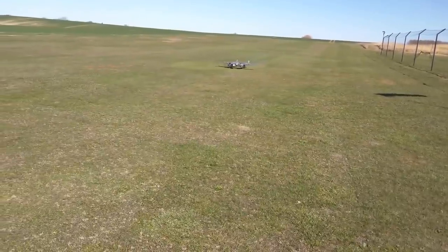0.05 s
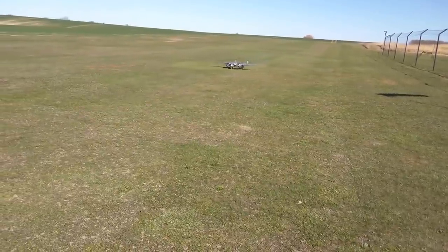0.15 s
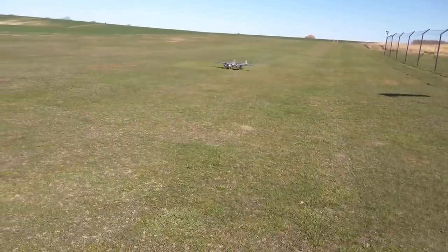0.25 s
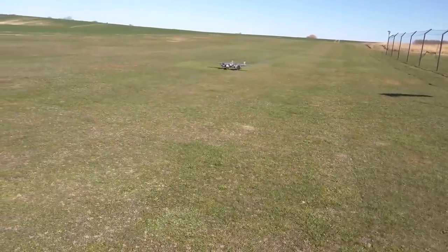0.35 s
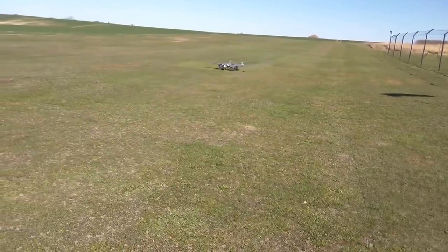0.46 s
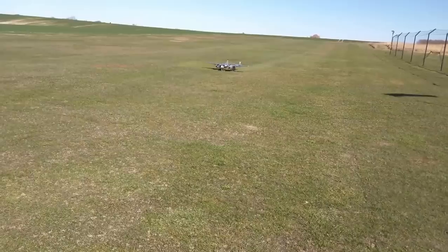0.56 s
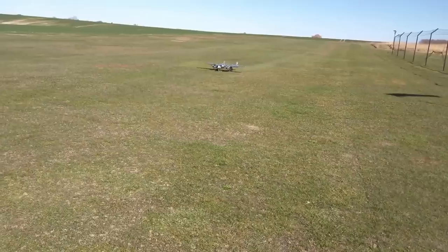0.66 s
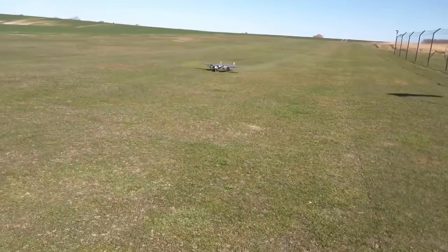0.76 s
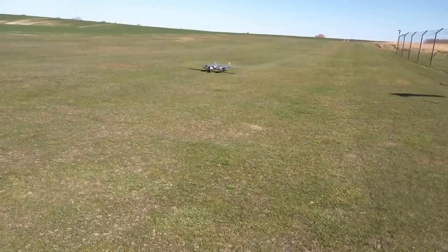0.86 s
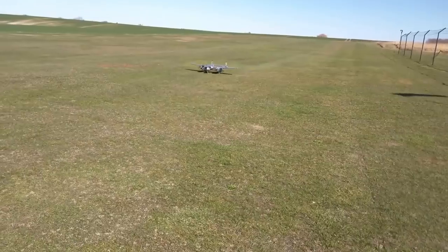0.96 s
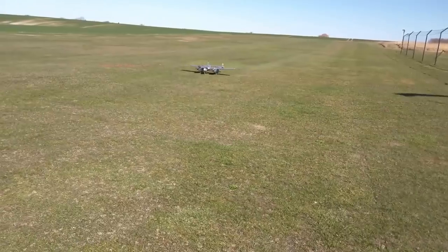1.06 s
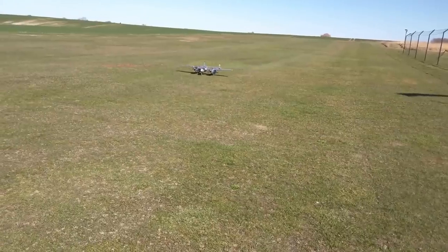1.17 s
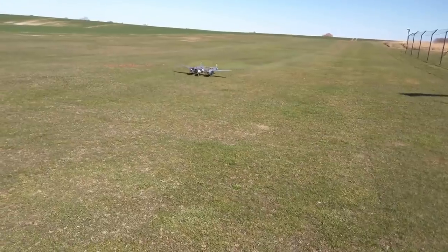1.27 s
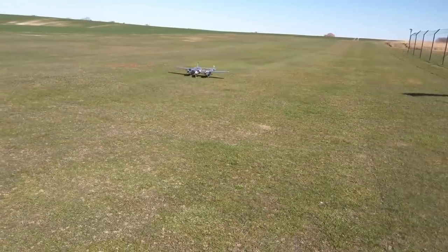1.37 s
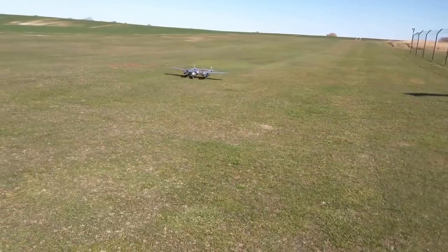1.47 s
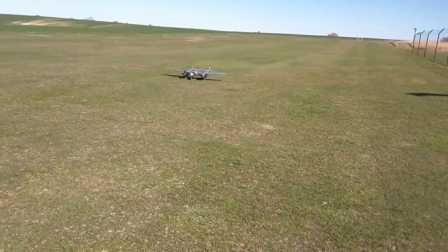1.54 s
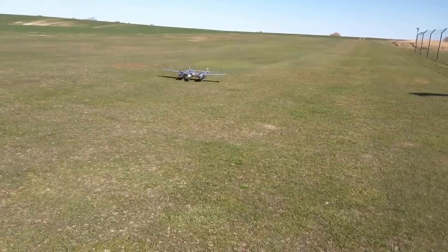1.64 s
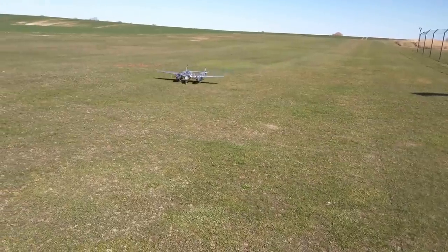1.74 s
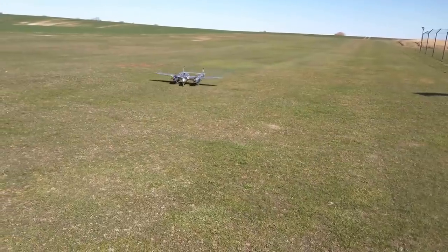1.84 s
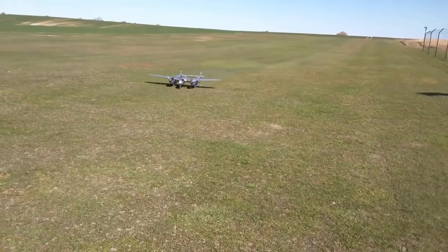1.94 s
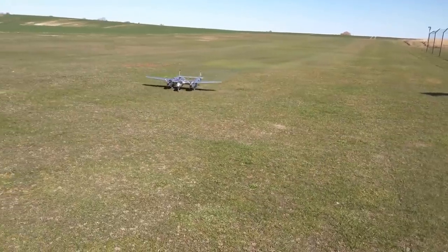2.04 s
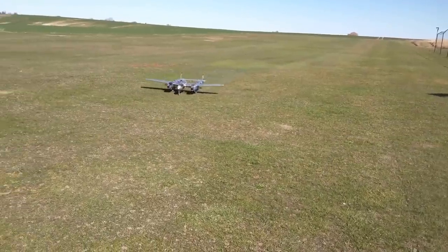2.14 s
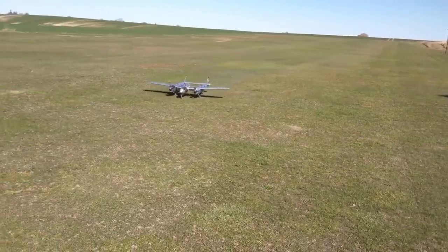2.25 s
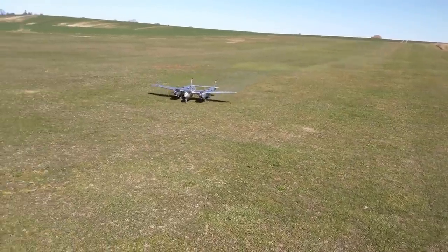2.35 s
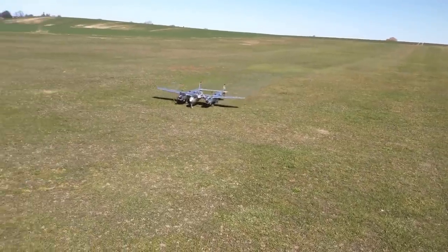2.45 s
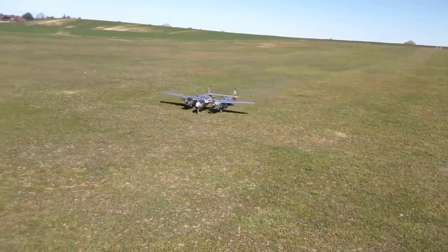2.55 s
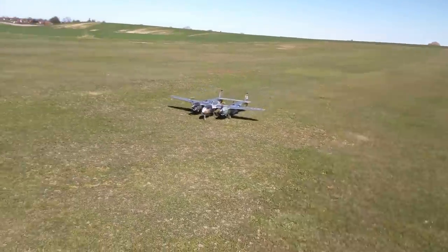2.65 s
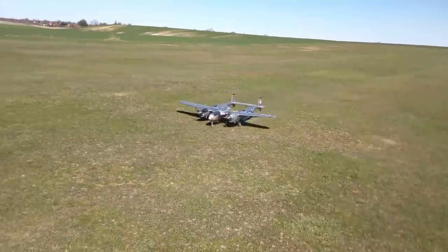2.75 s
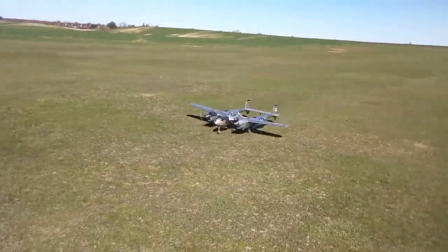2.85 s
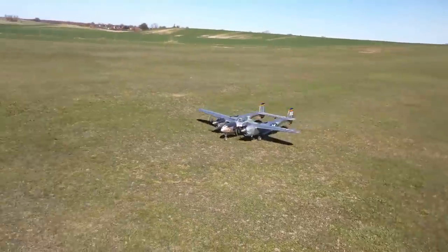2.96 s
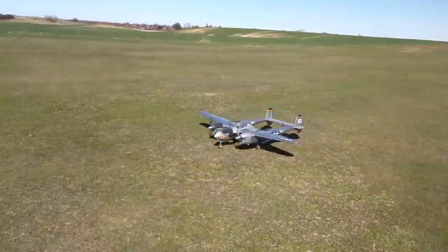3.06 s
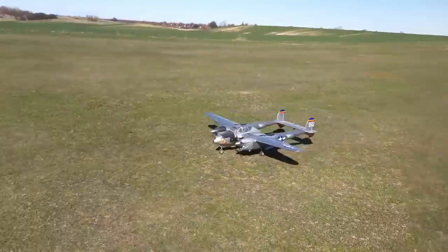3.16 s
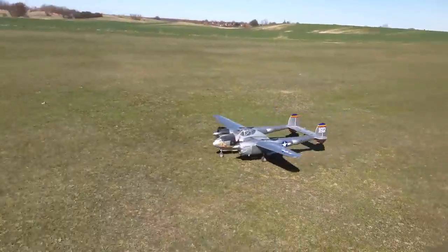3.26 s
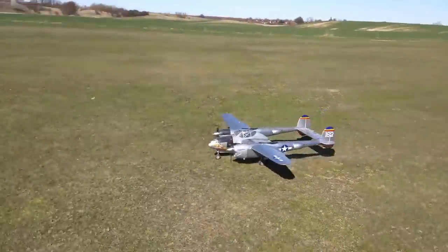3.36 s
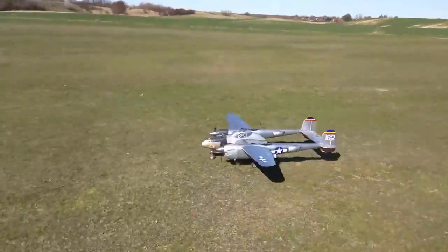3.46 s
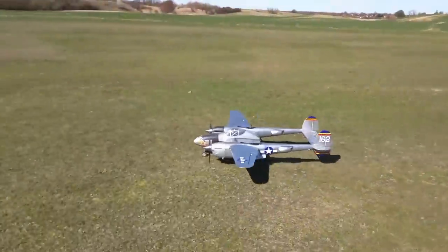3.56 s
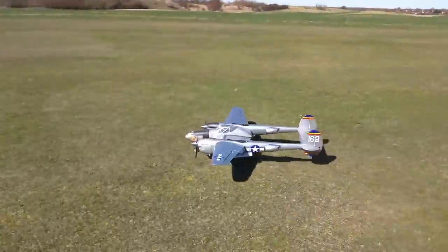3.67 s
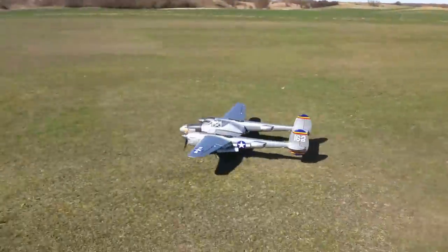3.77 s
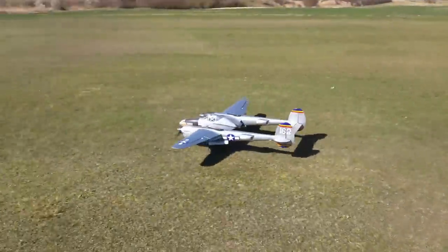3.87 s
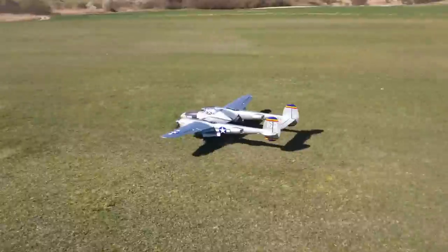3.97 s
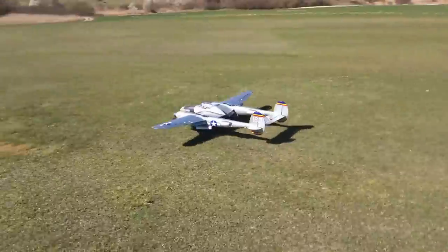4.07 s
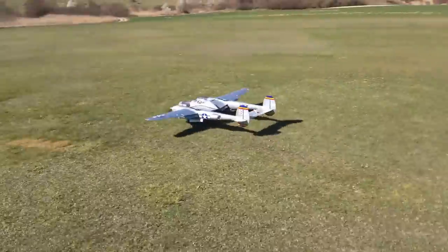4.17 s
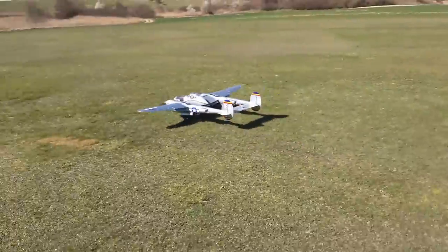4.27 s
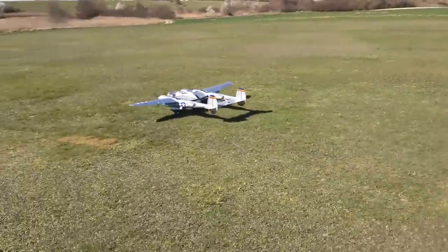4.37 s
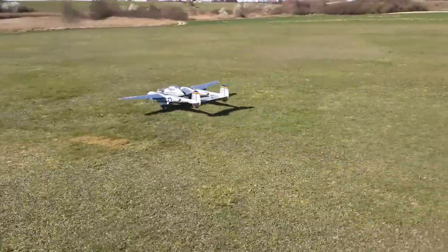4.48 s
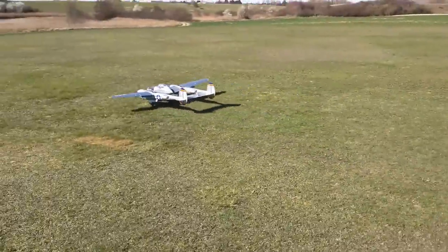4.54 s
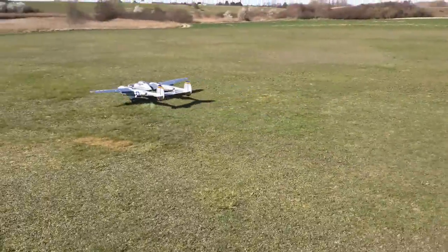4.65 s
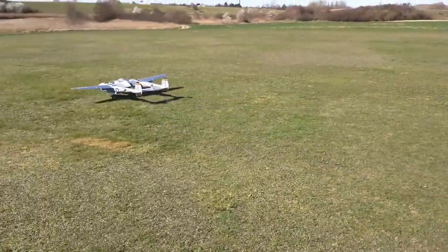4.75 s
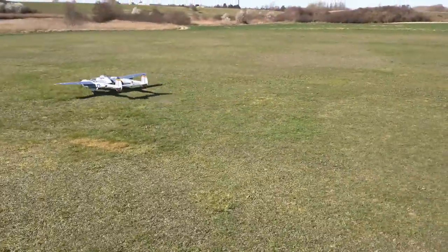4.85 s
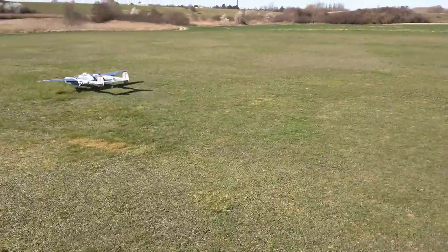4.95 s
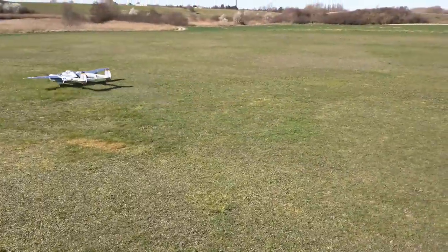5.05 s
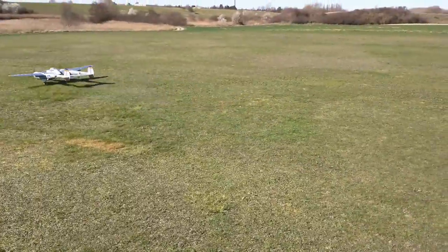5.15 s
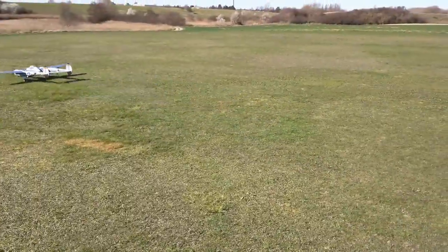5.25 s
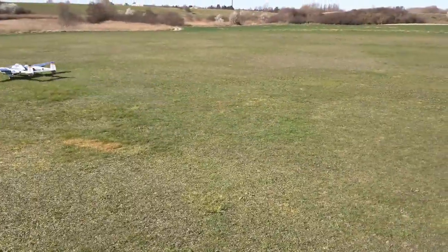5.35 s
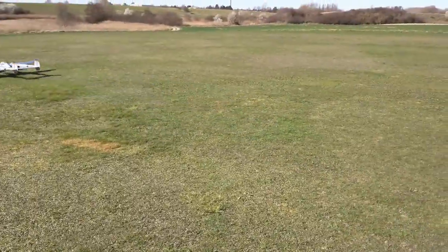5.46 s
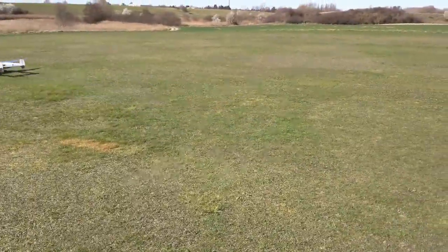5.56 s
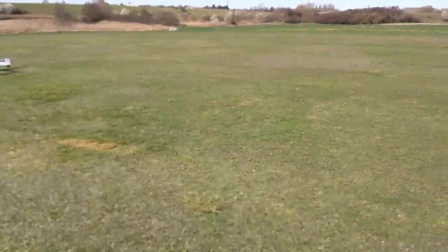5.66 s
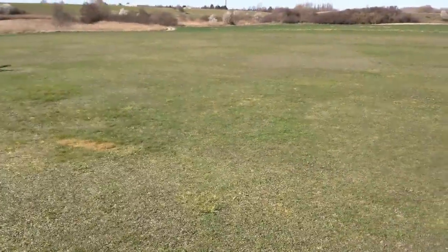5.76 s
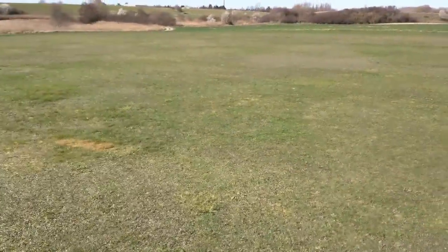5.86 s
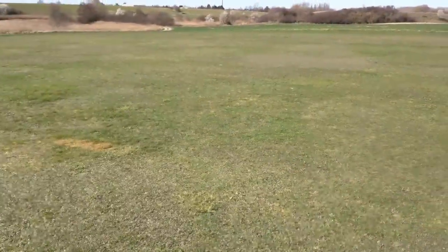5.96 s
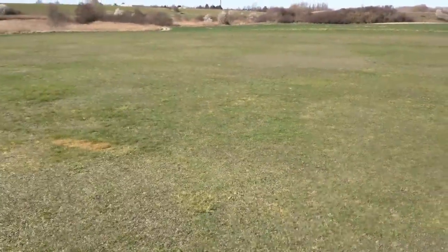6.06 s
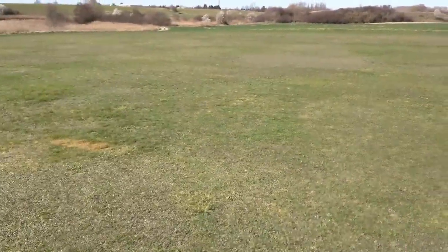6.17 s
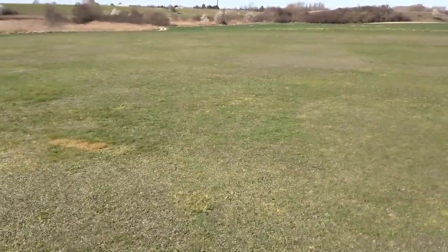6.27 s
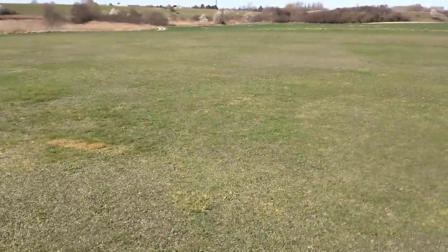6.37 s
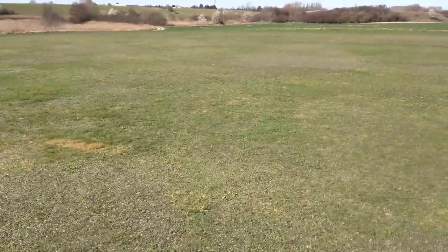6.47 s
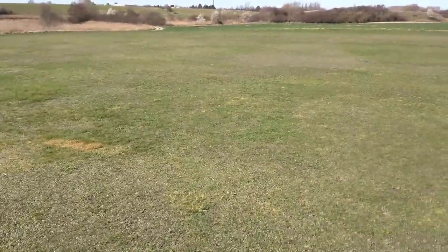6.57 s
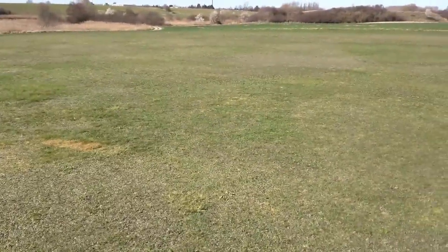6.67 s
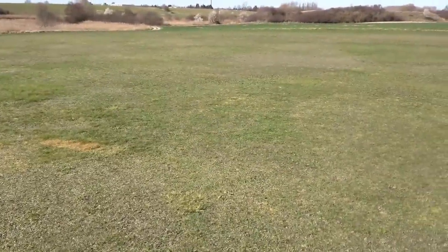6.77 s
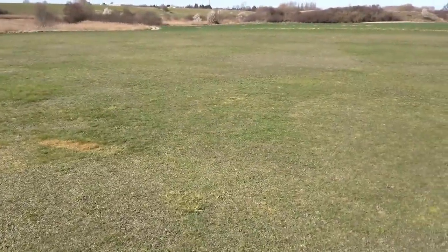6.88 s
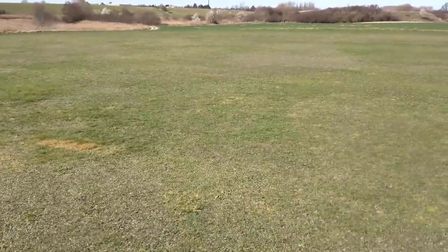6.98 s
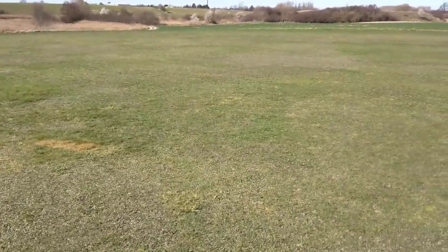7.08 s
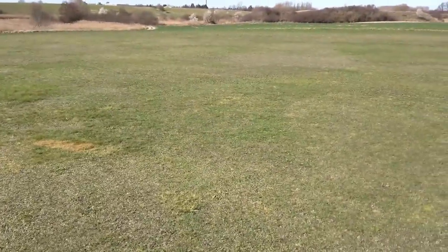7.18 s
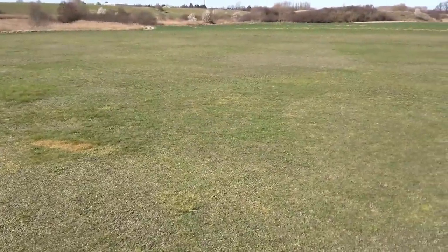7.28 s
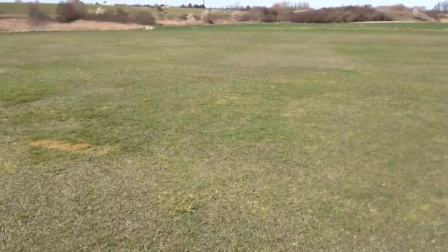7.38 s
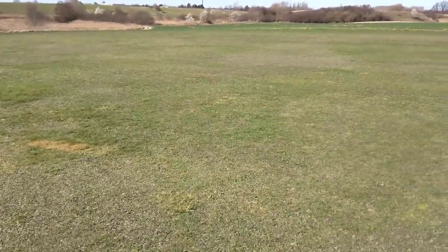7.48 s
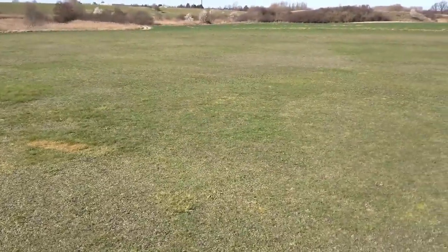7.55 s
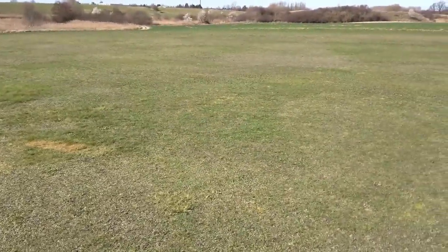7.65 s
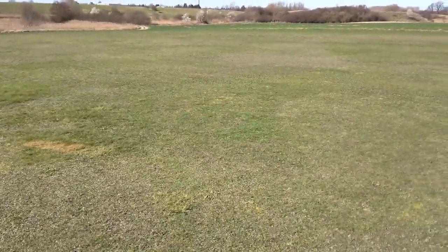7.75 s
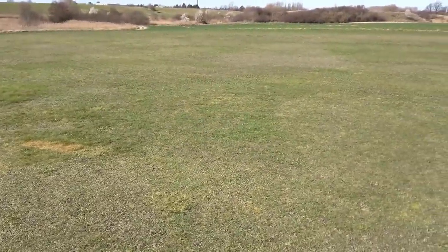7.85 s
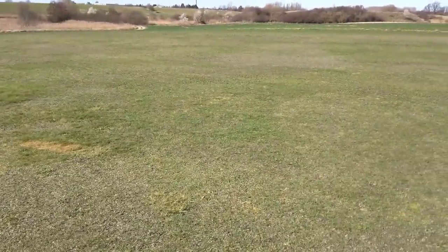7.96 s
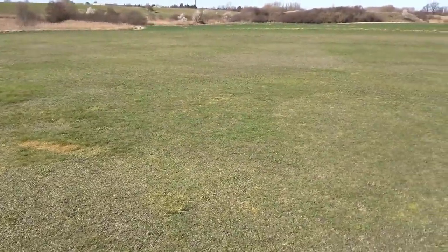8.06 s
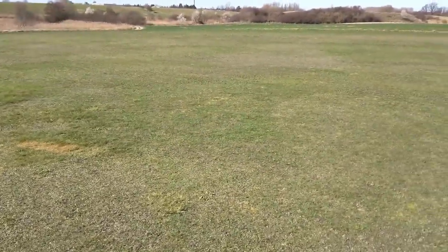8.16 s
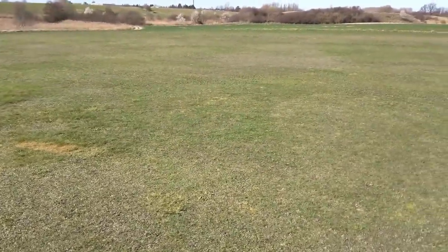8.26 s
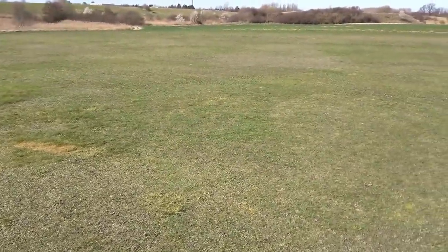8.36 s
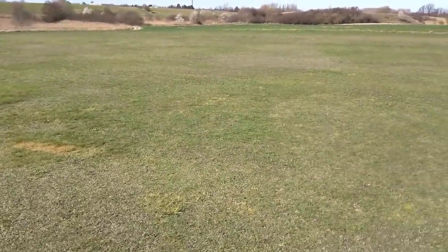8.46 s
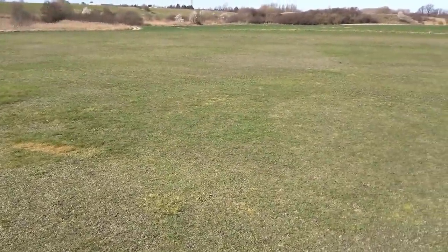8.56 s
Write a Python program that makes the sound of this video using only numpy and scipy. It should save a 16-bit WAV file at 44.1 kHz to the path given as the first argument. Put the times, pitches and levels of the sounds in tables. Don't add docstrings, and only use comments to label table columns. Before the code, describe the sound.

Outdoors on an open grass airfield, a large model plane with two small two-stroke engines taxis towards a handheld camera. Their unsynchronised, stuttering putter swells with raspy bark and hissing exhaust spit, peaks close by near four seconds, then recedes as both throttle down. A faint, lumpy idle remains, with low wind thumps on the microphone.

```python
import sys
import numpy as np
from scipy import signal
from scipy.fft import rfft, irfft
from scipy.io import wavfile
from scipy.ndimage import uniform_filter1d, map_coordinates

SR = 44100
rng = np.random.default_rng(int(sys.argv[2]) if len(sys.argv) > 2 else 0)


def store_wav(level_fs):
    pcm = np.round(np.clip(np.atleast_2d(level_fs), -1, 1) * 32767)
    wavfile.write(sys.argv[1], SR, pcm.T.astype(np.int16))


def amplitude_ratio(level_db):
    exponent = np.asarray(level_db, float) / 20
    return 10 ** exponent


N = 380141

# time in seconds, aspect (0 nose-on, 1 abeam, 2 tail-on).
ASPECT = [
    (0, 0.1),
    (2.2, 0.25),
    (2.8, 0.63),
    (4.9, 1.24),
    (5.4, 1.22),
    (6.4, 1.99),
    (8.62, 1.57),
]
# time in seconds, share (0-1) of crack softened into a long sigh of the rich exhaust.
IDLE = [
    (0, 0),
    (6.7, 0.06),
    (7.3, 0.82),
    (8.62, 0.38),
]


def unit(x):
    return x / np.sqrt(np.mean(x ** 2) + 1e-20)


def curves(rows):
    s, *cols = np.transpose(rows)
    return [np.interp(np.arange(N) / SR, s, c) for c in cols]


def wobble(rate_hz):
    knots = rng.standard_normal(int(N * rate_hz / SR) + 4)
    return map_coordinates(knots, [np.arange(N) * rate_hz / SR])


def coloured(x, points, causal=True):
    m = 2 ** 14
    hz, db = np.transpose(points)
    gain_db = np.interp(np.log(np.fft.rfftfreq(m, 1 / SR) + 1), np.log(hz + 1), db)
    cepstrum = irfft(np.log(amplitude_ratio(gain_db)), m)
    if causal:
        cepstrum[1:m // 2] *= 2
        cepstrum[m // 2 + 1:] = 0
    kernel = np.roll(irfft(np.exp(rfft(cepstrum)), m), m // 4)[:3 * m // 4]
    y = signal.oaconvolve(x, kernel)[m // 4:][:N]
    return y / np.sqrt(np.abs(uniform_filter1d(y ** 2, size=SR // 3)) + 1e-20)


def turning(x, table, causal=True):
    aspect, rows = curves(ASPECT)[0], np.array(table)
    power = .5 if causal else 1
    y = 0
    for side in range(3):
        share = np.clip(1 - np.abs(aspect - side), 0, 1) ** power
        y = y + share * coloured(x, rows[:, [0, side + 1]], causal)
    return y


def firings(shaft, start_turns, stutter, scatter_db):
    rate_hz = curves(shaft)[0]
    turns = np.cumsum(rate_hz) / SR - start_turns + rate_hz * .0025
    at = np.flatnonzero(np.diff(np.floor(turns)) > 0)
    db = scatter_db * rng.standard_normal(len(at))
    for first_s, last_s, weak_db in stutter:
        spell = np.flatnonzero((at > (first_s - .003) * SR) & (at < last_s * SR))
        db[spell[::2]] += weak_db
    jitter_s = .00004 * rng.standard_normal(len(at))
    train = np.zeros(N)
    train[np.clip(at + np.round(jitter_s * SR).astype(int), 0, N - 1)] = amplitude_ratio(db)
    return train


def puffs(train, rise_s, t60_s):
    t = np.arange(SR // 5) / SR
    shape = (1 - np.exp(-(t / rise_s) ** 2)) * amplitude_ratio(-60 * t / t60_s)
    return unit(np.abs(signal.fftconvolve(train, shape)[:N]) * rng.standard_normal(N))


def jets(train, peak_s, width_s):
    t = np.arange(SR // 50) / SR
    return np.abs(signal.fftconvolve(train, np.exp(-((t - peak_s) / width_s) ** 2 / 2))[:N])


def mottled(x, patchy_db):
    z = signal.stft(x, nperseg=256)[2]
    patches = uniform_filter1d(rng.standard_normal(z.shape), size=11, axis=0)
    patches = uniform_filter1d(patches, size=4, axis=1)
    y = signal.istft(z * amplitude_ratio(patchy_db * unit(patches)), nperseg=256)[1][:N]
    return unit(y) * np.std(x)


def balance():
    # time in seconds, nearness as thump level in dB, exhaust aim as spit re thump in dB.
    nearness = [(0, -27.5, -19.5), (.5, -25.5, -17.5), (1.0, -23.5, -12), (1.5, -23.5, -9),
                (2.0, -20.5, -7.5), (2.5, -21.5, -3.5), (3.0, -17.5, -6.5), (3.5, -15, -9),
                (3.9, -14.5, -14), (4.3, -17, -9), (4.8, -21.5, -7.5), (5.2, -25, -9), (5.6, -28, -5),
                (6.3, -31.5, -6.5), (6.8, -34.5, -16.5), (7.3, -37, -23), (7.8, -35, -13.5),
                (8.62, -36.5, -15)]
    # time in seconds, rich jet re lean jet in dB.
    unshaded = [(0, 8), (.5, -3), (1.4, 5), (2.0, -1), (2.9, 0), (3.9, 9), (4.6, 1), (5.15, 1), (5.3, -3),
                (6.2, -3), (6.5, -11), (7.0, -2), (7.6, 6), (8.62, -2)]
    # aspect, bark re thump, low re high spit, boom re thump, rich re lean thump, all in dB.
    sides = [(0, -20.5, -2.5, -8, -8.5), (.3, -13.5, -14.5, -14, -7), (.6, -14.5, -6.5, -10, -3),
             (1, -14.5, -8, 0.5, -2.5), (1.3, -17, -9, 3, -1.5), (2, -16, -7, 3.5, 0.5)]
    thump_db, aim_db = curves(nearness)
    rich_spit_db = curves(unshaded)[0]
    side, *cols = np.transpose(sides)
    bark_db, low_db, boom_db, rich_db = [np.interp(curves(ASPECT)[0], side, c) for c in cols]
    idle = curves(IDLE)[0]
    high_db = thump_db + aim_db
    bark_db = thump_db + bark_db - 3 * idle
    low_db = high_db + low_db + 14.5 * idle
    flow_db = -10 - 0.49 * (aim_db + 9.5)
    return thump_db, bark_db, low_db, high_db, flow_db, rich_db - 13 * idle, rich_spit_db, boom_db


def silencer_thump(burns, boom_db):
    # frequency in Hz, nose-on, abeam and tail-on gain in dB.
    ring = [(56.6, -33, -37, -29), (146.6, -21, -4.5, -15.5), (206.5, -8, 0.5, 2.5), (253, -1, 0, 3.5),
            (300, -9.5, -2, 0), (369.5, -6, -2.5, -4.5), (431, -20.5, -5.5, -14.5), (615, -14, -14, -28.5),
            (673, -20.5, -18, -15.5), (1090, -29.5, -31, -21), (2370, -85.5, -88, -101.5)]
    # frequency in Hz, gain in dB.
    airframe = [(30, -21.5), (80, -12), (125, -7.5), (165, -4), (210, -6), (400, -43.5), (1500, -102.5)]
    pressure = burns + 0.4 * puffs(burns, 0.0046, 0.05) + 0.21 * rng.standard_normal(N)
    boom = np.roll(coloured(pressure, airframe), -round(.005 * SR))
    return turning(pressure, ring) + amplitude_ratio(boom_db - 5.0) * boom


def pipe_bark(burns, astern):
    # frequency in Hz, nose-on, abeam and tail-on gain in dB.
    pipe = [(202, -45, -44.5, -46), (404, 8, 2, -3), (620, 4, 9.5, -6), (840, 1.5, -4.5, 1),
            (1190, 2.5, -3, -1), (1530, -2.5, -3.5, -6.5), (2340, -1, -4, -16), (2930, -13, -11, -10.5),
            (3260, -8, -7.5, -7.5), (4420, -25, -11.5, -16.5), (6000, -21, -29, -52),
            (9000, -80, -92, -105)]
    turbulence = 0.91 * puffs(burns, 0.00036, 0.02)
    x = (1 - 0.5 * astern) * burns + (1 - 0.062 * astern) * turbulence + 1.2 * rng.standard_normal(N)
    return turning(x, pipe)


def gas_spit(rich, spits, astern, low_db, high_db, flow_db):
    # frequency in Hz, nose-on, abeam and tail-on gain in dB.
    low_hiss = [(1990, -42, -74, -41), (3210, -11, -18, -16), (4200, -13, -3.5, -24), (5420, -14.5, 1, -3),
                (7500, -5, 3, 9.5), (7610, -2.5, -3, 7), (9800, -22.5, -37, 8), (12500, -86, -71.5, -43)]
    high_hiss = [(5770, -36, -47.5, -91), (7570, -19, -6, -34), (8300, 0.5, -2, 5), (9800, 3.5, 4, 2),
                 (10300, 9, -4.5, 4), (11600, 2.5, -1, -3.5), (13000, 3, -2.5, 0), (15800, -7, -5, -1),
                 (20300, -10, -4, -8)]
    idle = np.clip(curves(IDLE)[0], 0, 1)
    gate = (1 - astern) * jets(spits, .0023, .0011) + 2.0 * astern * jets(spits, .002, .001)
    gate = gate * (1 - .6 * idle)

    def gas():
        sigh = 1.8 * idle * puffs(rich, 0.00073, 0.038)
        rush = sigh + 1.16 * puffs(spits, 0.002, 0.11) + amplitude_ratio(0.47 * wobble(30)) * rng.standard_normal(N)
        return gate * mottled(rng.standard_normal(N), patchy_db=2.8) + amplitude_ratio(flow_db - 8) * rush

    low = amplitude_ratio(low_db - 0.5) * turning(gas(), low_hiss, False)
    return low + amplitude_ratio(high_db - 2.0) * turning(gas(), high_hiss, False)


def engines():
    # time in seconds, speed in turns a second.
    lean_shaft = [(0.0, 42.08), (0.45, 42.36), (0.95, 44.75), (1.25, 43.4), (1.8, 43.41), (2.75, 39.95),
                  (3.5, 42.26), (4.25, 40.81), (4.7, 40.65), (4.85, 39.49), (5.25, 34.41), (5.8, 30.71),
                  (6.5, 29.08), (6.9, 25.96), (7.45, 24.66), (7.7, 25.2), (8.1, 24.54), (8.62, 25.3)]
    rich_shaft = [(0.0, 33.11), (0.65, 32.32), (1.1, 34.26), (1.4, 34.12), (2.45, 34.59), (2.7, 35.13),
                  (3.0, 33.2), (3.4, 34.17), (3.9, 33.46), (4.5, 33.54), (5.05, 31.89), (5.6, 27.03),
                  (5.95, 26.97), (6.6, 25.03), (7.45, 34.77), (7.7, 35.34), (8.1, 37.79), (8.62, 35.52)]
    # start in seconds, end in seconds, weak burn in dB.
    lean_stutter = [
        (4.87, 4.89, -18),
        (5.4, 5.87, -16),
        (5.9, 5.93, -7),
        (6.03, 6.13, -12),
        (6.21, 6.29, -17),
        (6.4, 6.5, -14),
        (6.58, 6.68, -4.5),
    ]
    rich_stutter = [(.05, .56, -14), (.76, 2.76, -17), (2.92, 2.94, -14), (3.22, 3.24, -14),
                    (3.28, 3.3, -7), (3.33, 3.95, -13), (4.07, 5.29, -16), (5.4, 5.43, -16),
                    (5.51, 5.68, -16), (5.77, 6.01, -15), (6.1, 6.13, -15), (6.18, 8.62, -10)]
    thump_db, bark_db, low_db, high_db, flow_db, rich_db, rich_spit_db, boom_db = balance()
    lean = firings(lean_shaft, .028, lean_stutter, scatter_db=1.2)
    rich = firings(rich_shaft, .102, rich_stutter, scatter_db=1.8)
    burns = unit(lean + amplitude_ratio(rich_db) * rich)
    spits = (lean + amplitude_ratio(rich_spit_db) * rich) / np.maximum(1, amplitude_ratio(rich_spit_db))
    astern = np.clip(curves(ASPECT)[0] - 1, 0, 1)
    thump = amplitude_ratio(thump_db - 5.5) * silencer_thump(burns, boom_db)
    bark = amplitude_ratio(bark_db - 1.5) * pipe_bark(burns, astern)
    return thump + bark + gas_spit(rich, spits, astern, low_db, high_db, flow_db)


def turf(x):
    # time in seconds, echo delay in ms, strength (0-1).
    ground = [(0, 1.52, .57), (1.05, 1.49, 0.51), (1.95, 1.47, 0.58), (2.55, 1.386, 0.59),
              (3.5, 1.268, 0.61), (4.35, 1.393, 0.8), (5.2, 1.34, 0.67), (6.15, 1.23, 0.4),
              (6.8, 1.09, 0.1), (8.62, 1.125, 0.42)]
    hz, t, z = signal.stft(x, SR, nperseg=1024, noverlap=768)
    s, *cols = np.transpose(ground)
    delay_ms, strength = [np.interp(t, s, c) for c in cols]
    aspect = np.interp(t, *np.transpose(ASPECT))
    corner_hz = np.interp(aspect, [0, 1, 2], [16000, 7000, 9000])
    hz = hz[:, None]
    lead_rad = 1.136 * np.clip(hz / 800, 0, 1)
    phase_rad = lead_rad - 2 * np.pi * hz * delay_ms * 0.00099
    echo = np.clip(strength, 0, 1) / (1 + (hz / corner_hz) ** 2) * np.exp(1j * phase_rad)
    return signal.istft(z * (1 + echo), SR, nperseg=1024, noverlap=768)[1][:N]


def wind():
    # time in seconds, buffet level in dB.
    breeze = [(0, -31), (.3, -36), (.7, -27.5), (2.0, -36.5), (2.85, -33), (3.1, -23), (4.3, -27.5),
              (5.1, -27.5), (5.5, -32.5), (6.9, -33.5), (7.5, -31.5), (8.62, -27.5)]
    # time in seconds, peak in dB, length in seconds.
    gusts = [(.07, -24, 0.035), (0.54, -31, 0.095), (0.75, -26, 0.027), (0.93, -24, 0.032),
             (1.41, -28, .04), (1.77, -33, 0.07), (3.06, -17.5, 0.044), (3.38, -15, 0.048),
             (3.893, -20, .04), (4.062, -18, .04), (4.295, -17.5, 0.031), (4.544, -23, 0.044),
             (4.69, -24.5, .04), (4.99, -26.5, .05), (5.586, -22, 0.029), (5.872, -20.5, 0.052),
             (6.27, -18.5, 0.023), (6.469, -19.5, 0.033), (6.663, -17.5, 0.013), (6.946, -26.5, 0.093),
             (7.303, -21.5, 0.032), (7.602, -24, 0.017), (7.789, -16, 0.017), (7.947, -24.5, 0.055),
             (8.333, -22, 0.01)]
    # start in seconds, peak in dB, pitch in Hz.
    thuds = [(5.546, -44, 40.4), (5.549, -14, 85.5), (5.673, -29, 170), (5.843, -15, 56.5),
             (6.254, -10, 38.6), (6.65, -8.5, 58.6), (6.807, -18, 93), (6.961, -15, 41.2),
             (7.292, -16, 41.6), (7.593, -23, 40.7), (7.747, -22, 113), (7.79, -6, 72), (7.879, -26, 39.8),
             (8.146, -13, 40.7), (8.317, -17, 60), (8.391, -18, 102)]
    # frequency in Hz, gain in dB.
    buffet = [(10, 2), (25, -5.5), (50, 0.5), (90, -8.5), (160, -12), (300, -25), (600, -41), (2000, -64)]
    now = np.arange(N) / SR
    power = amplitude_ratio(curves(breeze)[0]) ** 2
    for s, db, length_s in gusts:
        power = power + amplitude_ratio(db) ** 2 * np.exp(-((now - s) / length_s) ** 2)
    x = np.sqrt(power) * amplitude_ratio(2.26 * wobble(18)) * coloured(rng.standard_normal(N), buffet)
    t = np.arange(SR // 12) / SR
    for s, db, hz in thuds:
        swing = -np.sin(2 * np.pi * hz * t) * t * hz * np.exp(-1.6 * t * hz)
        x[round(s * SR):][:len(t)] += (amplitude_ratio(db + 6.5) * swing)[:N - round(s * SR)]
    return x


def field():
    # frequency in Hz, gain in dB.
    open_air = [(180, -23), (300, -7.5), (574, -7.5), (900, -17), (1530, -21), (3640, -26.5), (4670, -23.5),
                (8790, -21.5), (16000, -74)]
    return amplitude_ratio(-49 + 1.1 * wobble(6.9)) * coloured(rng.standard_normal(N), open_air)


def scene():
    return (turf(engines()) + wind() + field())[None]


def roll_off(x):
    return signal.sosfilt(signal.butter(12, 17000, fs=SR, output="sos"), x)


def record(dry):
    rounded = dry / (1 + np.abs(dry / .74) ** 4) ** (1 / 4)
    top_hz = 15900
    lowpass = 1 / (1 + (np.fft.rfftfreq(N, 1 / SR) / top_hz) ** 120)
    limited = irfft(rfft(rounded) * lowpass, N)
    return roll_off(limited)


dry = scene()
out = record(dry)
store_wav(out)
```